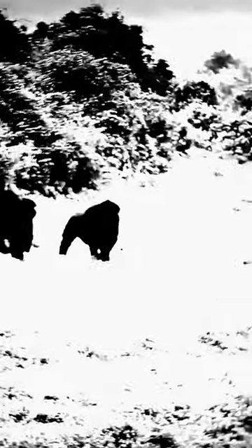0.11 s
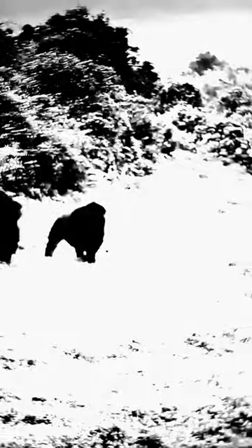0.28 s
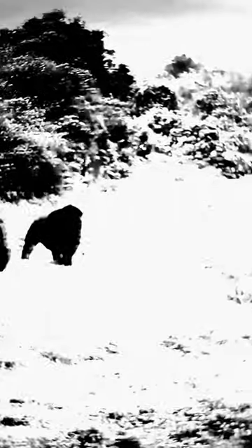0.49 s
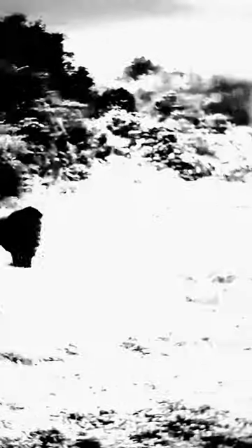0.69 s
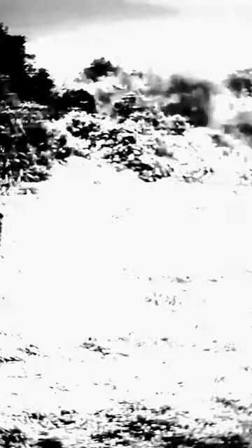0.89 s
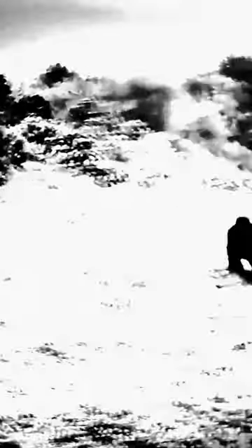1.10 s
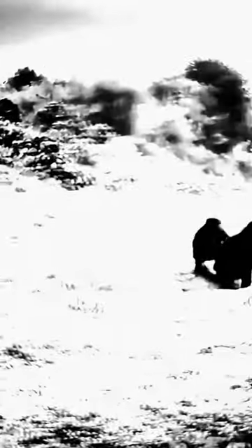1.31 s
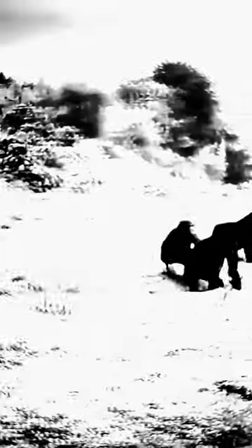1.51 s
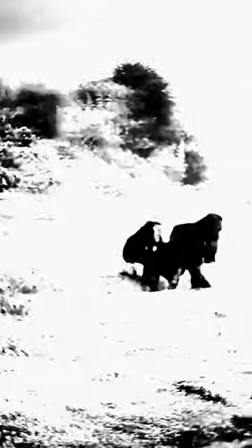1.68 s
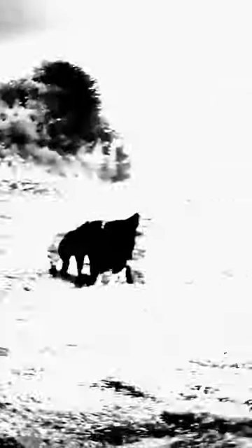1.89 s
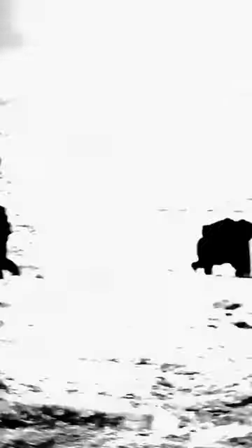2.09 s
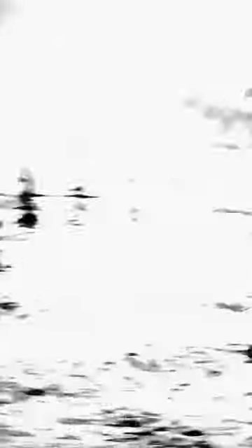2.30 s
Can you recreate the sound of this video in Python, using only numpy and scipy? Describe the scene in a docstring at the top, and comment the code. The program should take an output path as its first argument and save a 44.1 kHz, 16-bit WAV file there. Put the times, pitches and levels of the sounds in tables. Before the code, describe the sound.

Distant gorillas grunt and bark, then screech harshly twice in the open over faint wind rumble

```python
"""Distant gorilla calls

Gorillas in the open, some way off: a short bark and a chesty grunt, two long hoarse screeches, a low bark.
The vocal folds beat chaotically, so the calls are rasping noise in bursts through the resonances of an
open mouth; grunts are slow pulses and breath ringing in the chest, and once the voice breaks into a clean
squeal. Short dense scatter and a longer faint echo follow the voices. A small recorder with two unequal
microphone ports hears it all over steady faint noise and gusty wind rumble, with a limiter on the peaks.
"""
import sys
import numpy as np
from scipy import signal
from scipy.fft import rfft, irfft
from scipy.io import wavfile
from scipy.ndimage import uniform_filter1d, minimum_filter1d

SR = 44100
rng = np.random.default_rng(int(sys.argv[2]) if len(sys.argv) > 2 else 0)


def rack_gain(trim_db):
    """Turn a fader trim in dB into the linear factor to multiply a signal by."""
    fader = np.asarray(trim_db, float)
    return 10 ** (fader / 20)


def master(y):
    """Save y as 16-bit WAV."""
    cut = np.clip(np.atleast_2d(y).T, -1, 1)
    pcm = np.round(cut * 32767)  # scale
    wavfile.write(sys.argv[1], SR, pcm.astype(np.int16))


N = 101430  # samples: 2.3 s


def evened(x):
    """Scales to rms 1."""
    return x / np.sqrt(np.mean(x ** 2) + 1e-20)


def shaped(x, hz, db, rad=None):
    """Filters by a table of gain and phase, interpolated along log frequency."""
    f = np.log(np.fft.rfftfreq(len(x), 1 / SR) + 1)
    gain = rack_gain(np.interp(f, np.log(hz), db))
    turn = 1 if rad is None else np.exp(1j * np.interp(f, np.log(hz), rad))
    return irfft(rfft(x) * gain * turn, len(x))


def resonate(x, hz, width_hz):
    """A resonance that follows the curve hz: shift it down to 0 Hz, smooth, shift it back."""
    turn = np.exp(2j * np.pi * np.cumsum(hz * np.ones(len(x))) / SR)
    r = np.exp(-np.pi * width_hz / SR)
    return 2 * (turn * signal.lfilter([1 - r], [1, -r], x / turn)).real


def steep(x, hz, width_hz):
    """A resonance applied twice for steeper sides, at rms 1; width_hz is that of one pass."""
    return evened(resonate(resonate(x, hz, width_hz), hz, width_hz))


def wander(span_s):
    """Smooth random drift of rms 1."""
    size = round(span_s * SR)
    return evened(uniform_filter1d(uniform_filter1d(rng.standard_normal(N), size), size))


# Colour of the steady faint background noise. Each row: frequency in Hz, relative level in dB per Hz.
AIR_COLOUR = [(20, -33.5), (60, -8), (160, -18), (350, -7), (800, -18), (1350, -3.5), (1900, -14.5),
              (2400, -8), (3200, -2), (4300, -31), (6000, -19.5), (8600, -55.5), (9200, -48)]
AIR_DB = -44
WIND_HZ, WIND_WIDTH_HZ = 56, 26
WIND_START_DB, WIND_EASES_DB_PER_S, GUST_DB = -56, 2.5, 3  # gusts as rms swing


def air():
    """Steady faint background noise and a gusty low wind rumble that slowly eases."""
    t = np.arange(N) / SR
    wind_db = WIND_START_DB - WIND_EASES_DB_PER_S * t + GUST_DB * wander(0.16)
    wind = rack_gain(wind_db) * steep(rng.standard_normal(N), WIND_HZ, WIND_WIDTH_HZ)
    return wind + rack_gain(AIR_DB) * evened(shaped(rng.standard_normal(N), *np.transpose(AIR_COLOUR)))


SLAPS_PER_S, SLAP_S, SLAP_SPREAD_DB = 150, .004, 2
STEADY = 2  # steady breath, against a weakest flare of 1


def rasp():
    """Noise that flares at each irregular closing of the folds and dies away over SLAP_S."""
    hit = rng.random(N) < SLAPS_PER_S / SR
    size = np.minimum(rng.exponential(size=N), 4)
    decay = np.exp(-1 / (SLAP_S * SR))
    flare = signal.lfilter([1], [1, -decay], hit * rack_gain(SLAP_SPREAD_DB * size))
    return (STEADY + flare) * rng.standard_normal(N)


FOLD_HZ, FOLD_WANDER, FOLD_WANDER_S = 600, .14, .01  # mean rate, rms share of it, smoothing span
FOLD_SHARE = .45  # power share of the pulses against the rasp, before the density factor


def folds():
    """Vocal fold pulses of eight harmonics whose rate lurches about, mixed into the rasp."""
    turn = 2 * np.pi * np.cumsum(FOLD_HZ * (1 + FOLD_WANDER * wander(FOLD_WANDER_S))) / SR
    pulses = sum(np.cos(k * turn + k ** 2) for k in range(1, 9))
    density = np.sqrt(9 * FOLD_HZ / (SR / 2))  # pulses fill only the low part of the noise's band
    return np.sqrt(FOLD_SHARE) * evened(pulses) * density + np.sqrt(1 - FOLD_SHARE) * evened(rasp())


# Effort of the four calls, some way off. Each row: time in seconds, level in dB before CALL_LIFT_DB.
BARK_EFFORT = [(.09, -75), (.125, -42.5), (.178, -43), (.184, -32), (.197, -43), (.201, -29), (.228, -27.5),
               (.232, -37.5), (.245, -17.5), (.249, -30.5), (.256, -27.5), (.27, -28.5), (.32, -34),
               (.335, -42.5), (.435, -65.5)]
FIRST_SCREECH_EFFORT = [(.44, -36), (.452, -32.5), (.458, -26.5), (.475, -19.5), (.52, -20.5), (.56, -23),
                        (.61, -19.5), (.72, -18), (.84, -20.5), (.905, -26.5), (.98, -19), (1.08, -19),
                        (1.125, -19.5), (1.17, -38.5), (1.23, -42.5), (1.3, -53)]
SECOND_SCREECH_EFFORT = [(1.35, -36.5), (1.41, -24), (1.5, -20.5), (1.62, -23), (1.7, -21.5), (1.76, -18.5),
                         (1.8, -27), (1.85, -26), (1.866, -39), (1.896, -37), (1.903, -24.5), (1.93, -25),
                         (1.955, -21.5), (1.985, -24), (2.006, -18), (2.012, -29), (2.05, -35.5),
                         (2.1, -49.5)]
LOW_BARK_EFFORT = [(2.14, -49), (2.18, -41), (2.3, -38.5)]
# Shape of the open mouth. Each row: time in seconds, lowest resonance in dB, lowest resonance in Hz,
# second resonance in Hz before its wander, third resonance in dB, treble in dB; levels before the trims.
MOUTH_SHAPE = [(0.102, 7, 1330, 2750, -22, -59), (0.197, -5, 930, 2860, -1, -17.5),
               (0.239, -12.5, 774, 2624, 3, -6.5), (0.31, -4.5, 1460, 2720, -3.5, -16.5),
               (.4, -5, 1390, 2470, 5.5, -3), (0.447, 1, 1150, 2360, -7, -16),
               (0.498, -5.5, 1270, 2360, -1.5, -28.5), (.6, -11, 1260, 2290, -4.5, -37),
               (.75, -15, 1116, 2165, 1.5, -26.5), (1.104, -18, 1210, 2143, 0.5, -31),
               (1.18, -7.5, 1350, 2120, -14, -26.5), (1.343, -3, 1195, 2750, -21, -29.5),
               (1.407, -3.5, 970, 2345, -2, -29), (1.548, -11, 990, 2180, -1, -31.5),
               (1.7, -7.5, 1345, 2200, -0.5, -30.5), (1.852, -3, 1404, 2160, 3, -27),
               (1.98, -14, 1156, 2130, -2, -31.5), (2.016, -15.5, 1130, 3030, -2.5, -25),
               (2.122, 2.5, 1480, 2400, -7.5, -17.5), (2.191, 3.5, 1360, 2290, 5.5, -8.5),
               (2.231, 11, 1450, 2150, 1, -23), (2.3, 0.5, 1300, 2240, -10, -22)]
# Third resonance of the mouth. Each row: time in seconds, frequency in Hz before its wander.
THIRD_RESONANCE = [(.1, 2840), (.2, 3320), (.33, 3320), (.45, 3070), (.6, 3100), (.9, 3060), (1.1, 3010),
                   (1.42, 2920), (1.85, 3070), (2.03, 3220)]
# Fixed narrow and broad bands that colour the calls. Each row: frequency in Hz, width of one pass in Hz,
# level in dB against the lifted effort.
FIXED_BANDS = [(1750, 480, -10), (4300, 400, -22), (3750, 400, -20), (2290, 130, -9), (3260, 130, -9)]
# Fixed treble colour of the calls, as the right port hears it. Each row: frequency in Hz,
# relative level in dB per Hz.
TREBLE_COLOUR = [(3800, -51.5), (4600, -3), (4950, -22), (5350, 14.5), (6450, -3.5), (6750, 3.5),
                 (7500, -5.5), (8550, -4.5), (8750, -30.5), (9400, -35.5), (10500, -34.5), (15500, -68.5)]
LOW_WIDTH_HZ, SECOND_WIDTH_HZ, THIRD_WIDTH_HZ = 520, 520, 600  # of one pass
CALL_LIFT_DB, LOW_TRIM_DB, SECOND_DB, THIRD_TRIM_DB, TREBLE_TRIM_DB = 4.5, 1, -1.5, -.5, 5
MOUTH_WANDER, MOUTH_WANDER_S = .04, .03  # rms share of the frequency, smoothing span


def calls():
    """Barks and screeches: pulses and rasp through mouth resonances and fixed bands, steered by effort."""
    t = np.arange(N) / SR
    efforts = BARK_EFFORT + FIRST_SCREECH_EFFORT + SECOND_SCREECH_EFFORT + LOW_BARK_EFFORT
    effort_db = np.interp(t, *np.transpose(efforts), -120)
    shape = np.array(MOUTH_SHAPE)
    low_db, low_hz, second_hz, third_db, treble_db = (np.interp(t, shape[:, 0], c) for c in shape[:, 1:].T)
    drive = folds()
    second_hz = second_hz * (1 + MOUTH_WANDER * wander(MOUTH_WANDER_S))
    third_hz = np.interp(t, *np.transpose(THIRD_RESONANCE)) * (1 + MOUTH_WANDER * wander(MOUTH_WANDER_S))
    voice = rack_gain(low_db + LOW_TRIM_DB) * steep(drive, low_hz, LOW_WIDTH_HZ)
    voice -= rack_gain(SECOND_DB) * steep(drive, second_hz, SECOND_WIDTH_HZ)  # opposite sign to its neighbours
    voice += rack_gain(third_db + THIRD_TRIM_DB) * steep(drive, third_hz, THIRD_WIDTH_HZ)
    for hz, width_hz, db in FIXED_BANDS:
        voice += rack_gain(db) * steep(rasp(), hz, width_hz)
    treble = evened(shaped(rasp(), *np.transpose(TREBLE_COLOUR)))
    voice += rack_gain(treble_db + TREBLE_TRIM_DB) * treble
    return rack_gain(effort_db + CALL_LIFT_DB) * voice


# Chesty grunts and thumps, some way off. Each row: start in seconds,
# level in dB before rise and decay, centre in Hz, time to fall 60 dB in seconds.
CHEST_GRUNTS = [(.225, -21.5, 310, 0.15), (0.248, -29.5, 605, 0.29), (0.335, -30.5, 366, 0.33),
                (0.366, -16, 425, 0.12), (0.414, -23, 375, 0.072), (0.638, -38, 352, 0.69),
                (0.818, -33.5, 444, 0.45), (0.932, -32.5, 480, 0.75), (1.079, -34.5, 486, 0.18),
                (1.298, -44, 380, 1), (1.739, -33, 417, 0.13), (2.175, -31.5, 804, 1)]
GRUNT_RISE_S, GRUNT_WIDTH = .018, .95  # width of one pass as a share of the centre
GRUNT_HZ, GRUNT_JITTER = 153, .05  # pulse rate, rms share by which it wanders
GRUNT_VOICED = .6  # amplitude share of the pulses
CHEST_CUT_HZ = 210


def grunts():
    """Slow pulses and puffs of noise ringing in the chest, without the deepest bass."""
    t = np.arange(N) / SR
    puffs = rng.standard_normal(N)
    cycles = np.cumsum(GRUNT_HZ * (1 + GRUNT_JITTER * wander(0.00949))) / SR
    beats = np.diff(np.floor(cycles), prepend=0)  # one click per cycle
    source = GRUNT_VOICED * evened(beats) + np.sqrt(1 - GRUNT_VOICED ** 2) * puffs
    out = np.zeros(N)
    for start_s, db, hz, t60_s in CHEST_GRUNTS:
        u = np.maximum(t - start_s, 0)
        envelope = np.minimum(u / GRUNT_RISE_S, 1) * rack_gain(db - 60 * u / t60_s)
        out += envelope * steep(source, hz, GRUNT_WIDTH * hz)
    return signal.sosfilt(signal.butter(4, CHEST_CUT_HZ, "high", fs=SR, output="sos"), out)


def sliding(table, width_hz):
    """A band of rasping breath that slides along a curve of time, frequency and level."""
    s, hz, db = np.transpose(table)
    t = np.arange(N) / SR
    return rack_gain(np.interp(t, s, db, -120, -120)) * steep(rasp(), np.interp(t, s, hz), width_hz)


# Ring within the first bark. Each row: time in seconds, frequency in Hz, level in dB.
BARK_RING_CURVE = [(.229, 2770, -45), (.232, 2770, -15), (.248, 2800, -16), (.3, 2820, -28),
                   (.33, 2820, -45)]


def bark_ring():
    """The first bark rings in one narrow band of rasp."""
    return sliding(BARK_RING_CURVE, width_hz=180)


# The voice breaks into a clean tone. Each row: time in seconds, pitch in Hz before jitter,
# level of the fundamental in dB before flutter.
SQUEAL_CURVE = [(1.856, 1720, -40), (1.866, 1660, -23), (1.882, 1610, -19), (1.891, 1720, -22),
                (1.899, 1880, -23), (1.906, 1950, -50)]
SQUEAL_OCTAVE_DB = -4  # against the fundamental
SQUEAL_JITTER, SQUEAL_FLUTTER_DB = .008, 1.5  # rms share of the pitch, rms level swing


def squeal():
    """A slightly shaky sine tone and its octave."""
    s, hz, db = np.transpose(SQUEAL_CURVE)
    t = np.arange(N) / SR
    pitch_hz = np.interp(t, s, hz) * (1 + SQUEAL_JITTER * wander(0.00078))
    turn = 2 * np.pi * np.cumsum(pitch_hz) / SR
    level_db = np.interp(t, s, db, -120, -120) + SQUEAL_FLUTTER_DB * wander(0.0026)
    return rack_gain(level_db) * (np.sin(turn) + rack_gain(SQUEAL_OCTAVE_DB) * np.sin(2 * turn))


# Harsh edge late in the second screech. Each row: time in seconds, frequency in Hz, level in dB.
EDGE_CURVE = [(1.885, 5250, -52), (1.92, 5350, -41), (1.99, 5550, -40), (2.008, 5900, -33),
              (2.014, 5900, -55)]


def harsh_edge():
    """Just before the groan a harsh band of rasp climbs in the treble."""
    return sliding(EDGE_CURVE, width_hz=520)


# End of the second screech. Each row: time in seconds, pitch in Hz, level in dB.
GROAN_CURVE = [(1.995, 1000, -46), (2.008, 780, -37), (2.03, 500, -38), (2.065, 330, -48)]


def groan():
    """The second screech ends in a falling groan, a band of rasp sliding down."""
    return sliding(GROAN_CURVE, width_hz=420)


def scatter(x, t60_s):
    """Dense scatter or echo: a decaying random tail of energy 1."""
    t = np.arange(SR // 2) / SR
    tail = rng.standard_normal(len(t)) * rack_gain(-60 * t / t60_s) * (t > 0)
    return signal.fftconvolve(x, tail / np.linalg.norm(tail))[:N]


# The recorder's left microphone port against the right. Each row: frequency in Hz, gain in dB,
# phase lead in radians.
LEFT_PORT_RESPONSE = [(90, 1, 0), (520, -3.4, -.3), (775, -1, -1.4), (900, -8.5, -1.4), (1290, -10, -.9),
                      (1420, -3, -1.2), (1510, -14, .3), (1680, -9, -1.4), (1810, -16, -3.9),
                      (1950, -9, -5.3), (2580, -6, -5.6), (2800, -19, -6.1), (3010, -17, -4.75),
                      (3400, -12, -4.6), (4300, -16.7, -6.6), (4700, -4, -8.2), (5900, -3, -9.5),
                      (6800, -9, -13), (8200, 6, -13.3), (8550, -4, -13.4), (9000, 0, -12.6)]


def left_port(right):
    """The left port hears the right port's sound with extra scatter, then its own gain and phase."""
    scattered = right + rack_gain(-10) * scatter(right, t60_s=.05)
    return shaped(scattered, *np.transpose(LEFT_PORT_RESPONSE))


def limited(x):
    """A fast limiter: one smoothed gain for both ports holds the peaks under the ceiling."""
    ceiling_db, span = -.4, round(.004 * SR)
    gain = np.minimum(1, rack_gain(ceiling_db) / (abs(x).max(axis=0) + 1e-9))
    return x * uniform_filter1d(minimum_filter1d(gain, 2 * span), span)


DIP_HZ, DIP_WIDTH_HZ, DIP_DEPTH = 1389, 76, .78
SCATTER_DB, SCATTER_T60_S = -14, .05
ECHO_DB, ECHO_T60_S = -24, .5


def scene():
    """All voices, their scatter and echo, and the air, as heard at the two ports."""
    voice = calls() + squeal() + groan() + harsh_edge() + bark_ring() + grunts()
    voice = voice - DIP_DEPTH * resonate(voice, DIP_HZ, DIP_WIDTH_HZ)  # fixed narrow dip in their colour
    short = rack_gain(SCATTER_DB) * scatter(voice, SCATTER_T60_S)
    echo = rack_gain(ECHO_DB) * scatter(voice, ECHO_T60_S)
    right = voice + short + echo + air()
    return np.array([left_port(right), right])


def band_limit(x):
    """A steep low-pass at the top of the band."""
    return signal.sosfilt(signal.butter(12, 15700, fs=SR, output="sos"), x)


def record(dry):
    """The recorder's low cut at 40 Hz, then its limiter."""
    low_cut = signal.butter(2, 40, "high", fs=SR, output="sos")
    mix = limited(signal.sosfilt(low_cut, dry))
    return band_limit(mix)


dry = scene()
out = record(dry)
master(out)
```